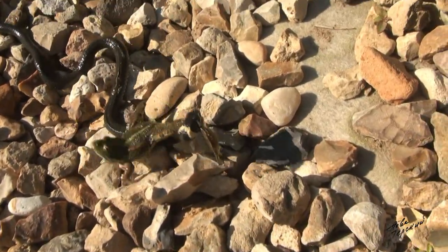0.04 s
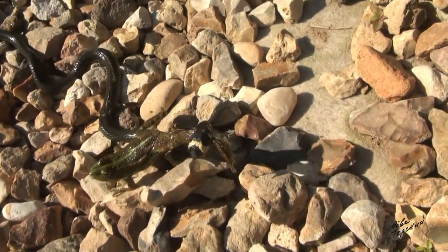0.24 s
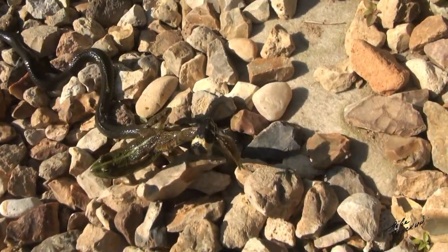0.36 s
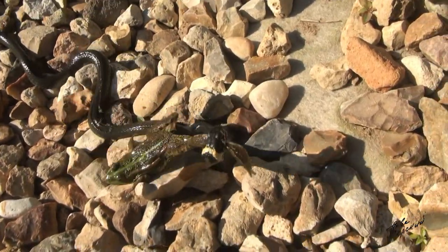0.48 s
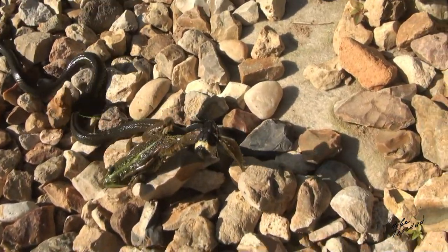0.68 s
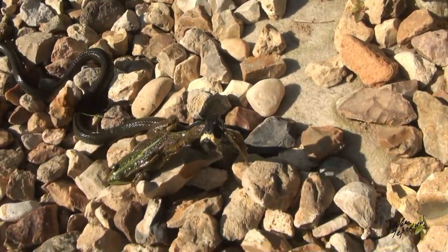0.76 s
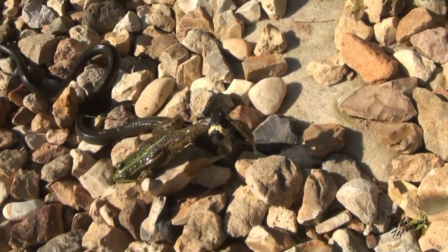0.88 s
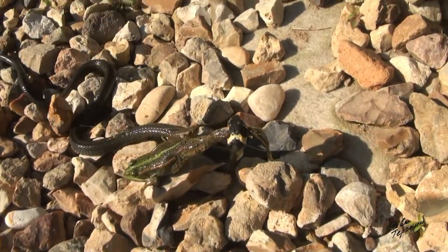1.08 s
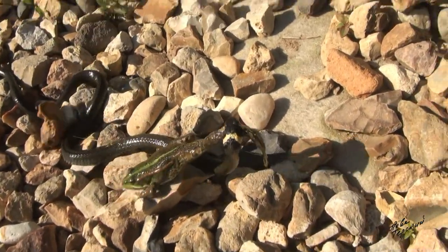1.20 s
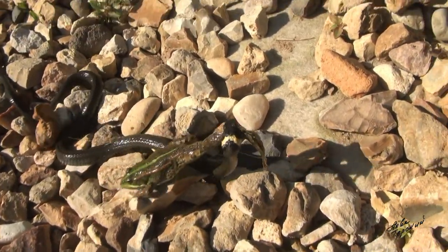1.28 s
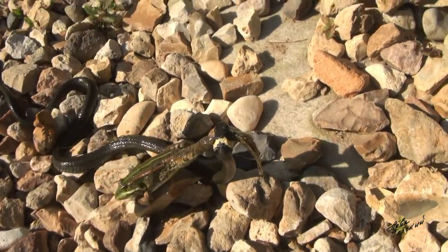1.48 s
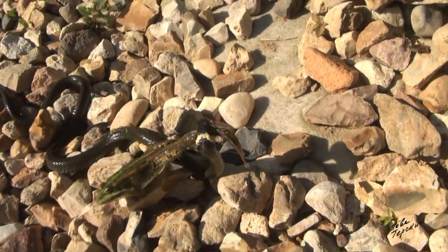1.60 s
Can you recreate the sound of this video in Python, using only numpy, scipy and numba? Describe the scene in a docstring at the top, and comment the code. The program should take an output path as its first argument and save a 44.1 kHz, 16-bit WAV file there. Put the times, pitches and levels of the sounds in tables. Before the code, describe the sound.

One loud, rasping frog scream comes near the start, close to the microphone. Scattered soft knocks and scrapes of pebbles follow, with faint distant birdsong and a steady outdoor hiss and low hum behind.

```python
"""Frog distress cry on pebbles

A frog seized by a snake gives one harsh cry: sharp larynx pulses ring in its open mouth,
speed up, catch, speed up again and slow to a creak. Pebbles knock and scrape under the
struggle. An insect buzzes briefly; small birds sing far off over hiss and a low hum."""
import sys
import numpy as np
from scipy import signal
from scipy.io import wavfile
from numba import njit

SR = 44100
rng = np.random.default_rng(int(sys.argv[2]) if len(sys.argv) > 2 else 0)


def digitize_waveform(pressure):
    """Quantize a signal to 16-bit integers and store it at the path in sys.argv[1].

    Rows of a 2-D input are taken as channels; values are limited to [-1, 1].
    """
    field = np.atleast_2d(pressure).T
    bounded = np.clip(field, -1, 1)
    quanta = np.round(bounded * 32767).astype(np.int16)
    wavfile.write(sys.argv[1], SR, quanta)


N = 72765
TIME = np.arange(N) / SR

# larynx pulses: (time [s], rate [Hz])
LARYNX_RATE = [(.2304, 194.1), (.2346, 79.5), (.2469, 335.1), (.2581, 411.1), (.2683, 555.1),
               (.2766, 477.3), (.2873, 194.9), (.3068, 441), (.3229, 393.8), (.3414, 401.6), (.3524, 329.4),
               (.3706, 315.5), (.3925, 205.6), (.4169, 166.2)]
# vocal strain, scales jitter and rasp: (time [s], factor [-])
VOICE_STRAIN = [(.295, 2.6), (.31, 0.4), (.4, 1.4)]
# resonance groups: (time [s], throat [dB], middle [dB], mouth [dB], top [dB])
CRY_GROUP_LEVELS = [(0.225, -56, -51.5, -36, -63), (.247, -24.5, -22, -28, -40.5),
                    (.272, -25, -21, -20.5, -43), (0.291, -30.5, -25, -22, -34.5),
                    (.313, -23.5, -21.5, -18, -34.5), (.35, -23.5, -31, -20, -31.5),
                    (0.412, -26, -42, -18.5, -40), (0.427, -27, -33, -33, -45), (0.446, -53, -62, -75, -97)]
# steady throat resonances: (centre [Hz], width [Hz], gain [dB])
THROAT_MODES = [(1200, 380, -1.5), (2680, 740, -9.5)]
# sinking middle resonance: (time [s], centre [Hz], width [Hz])
MIDDLE_GLIDE = [(.245, 2400, 1900), (.278, 2600, 1500), (.305, 2400, 1000), (.34, 2200, 900),
                (.365, 1550, 900)]
# mouth resonance, broad when agape, sinking as it shuts: (time [s], centre [Hz], width [Hz])
MOUTH_GLIDE = [(.236, 5500, 550), (.25, 5600, 2300), (.283, 6500, 2000), (.315, 6100, 1650),
               (.355, 5750, 1550), (.385, 5300, 950), (.415, 4850, 700), (.424, 4250, 900),
               (.435, 2300, 1500)]
# steady top resonances: (centre [Hz], width [Hz], gain [dB])
TOP_MODES = [(11500, 900, 4), (11650, 3500, 10)]
# pebble knocks: (time [s], impulse level [dB], contact low-pass [Hz], pitch factor [-])
PEBBLE_KNOCKS = [(0.5644, -27, 3270, 1.01), (0.651, -26.5, 1590, 1.002), (0.7426, -27, 5100, 1.064),
                 (.841, -37, 1800, 0.57), (0.994, -29, 1460, 0.56), (1.283, -30.5, 4560, 1.04),
                 (1.373, -31, 2500, 0.64), (1.4428, -31, 4970, 1.42), (1.4443, -28, 8950, 1.09)]
# pebble ring at pitch factor 1: (frequency [Hz], gain [dB], t60 [s])
PEBBLE_MODES = [(467, -3, 0.012), (883, -11.5, 0.047), (1370, -2.5, 0.018), (2150, -4, 0.006),
                (2940, 2, 0.0015)]
# stone over a hollow: (frequency [Hz], gain [dB], t60 [s])
HOLLOW_MODES = [(757, 5, 0.026), (1210, 3, 0.022), (1980, 0.5, 0.0056)]
# grit ticks: (time [s], level [dB], lower mode [Hz])
GRIT_TICKS = [(0.0492, -30, 2600), (.718, -37.5, 3220), (0.9102, -30, 2920), (.97, -41.5, 2860)]
# bodies dragging over stones: (centre time [s], half length [s], level [dB])
DRAGS = [(0.097, 0.0061, -44), (1.009, .012, -41), (1.277, 0.047, -48.5), (1.437, 0.023, -42),
         (1.649, 0.025, -45)]
# scrape spectrum: (frequency [Hz], relative density [dB])
SCRAPE_SPECTRUM = [(100, -6), (800, -0.5), (1200, 5), (2200, -11), (15000, -17.5)]
# insect resonances: (centre [Hz], width [Hz], gain [dB])
INSECT_MODES = [(11900, 700, -4.5), (14200, 1100, -6.5)]
# faint bird calls: (centre time [s], half length [s], centre [Hz], width [Hz], level [dB])
BIRD_CALLS = [(1.144, 0.04, 5460, 830, -54), (1.373, 0.088, 3900, 1130, -51.5)]
# outdoor noise: (frequency [Hz], relative density [dB])
AIR_SPECTRUM = [(25, -2), (107, -6.5), (871, -9), (2230, -13.5), (3170, -10.5), (3530, -19.5),
                (5580, -16.5), (15500, -25.5)]
# left-right likeness of air and scrapes: (frequency [Hz], correlation [0-1])
STEREO_LIKENESS = [(70, 1), (300, 0.76), (12000, 0.13)]
# distant hum: (time [s], level [dB])
HUM_LEVEL = [(.15, -54.5), (1.65, -64)]


def larynx(rate_hz, cycles, jitter_s=1e-5, shimmer_db=.44, rebound_s=.0012, puff_s=.00052, rasp=.038):
    """Uneven pulses, each with a weak inverted rebound and a noise puff. Returns voice and sizzle."""
    strain, = in_time(VOICE_STRAIN)
    pulse_s = np.interp(np.arange(1, int(cycles[SR // 2])), cycles, TIME)
    jitter, shimmer, rebound_jitter, rebound_shimmer = rng.standard_normal((len(pulse_s), 4)).T
    pulse_s += jitter_s * np.interp(pulse_s, TIME, strain) * jitter
    pulses = clicks(pulse_s, -from_db(shimmer_db * shimmer))
    pulses += clicks(pulse_s + rebound_s + 5e-5 * rebound_jitter, from_db(-12 + 2 * rebound_shimmer))
    from_pulse_s = np.abs(cycles - np.round(cycles)) / rate_hz
    puffs = rng.standard_normal(N) * np.exp(-from_pulse_s / puff_s)
    return pulses + rasp * strain * puffs, pulses + puffs


def frog(start_s=.22):
    """The larynx rings four resonance groups; the top one is mostly wet sizzle."""
    rate_hz, = in_time(LARYNX_RATE)
    cycles = np.cumsum(rate_hz * (TIME > start_s)) / SR
    voice, sizzle = larynx(rate_hz, cycles)
    groups = [cut(cut(resonances(voice, THROAT_MODES), 800, "high", order=4), 2740, "low", order=4),
              cut(formant(voice, MIDDLE_GLIDE), 1430, "high", order=3),
              cut(cut(formant(voice, MOUTH_GLIDE), 1580, "high"), 9340, "low", order=5),
              cut(resonances(sizzle, TOP_MODES), [9500, 14200], "band", order=3)]
    groups = np.array(groups) / np.sqrt(rate_hz)  # even power at any pulse rate
    sounding = (TIME > CRY_GROUP_LEVELS[0][0]) & (TIME < CRY_GROUP_LEVELS[-1][0])
    groups /= np.std(groups[:, sounding], axis=1, keepdims=True)
    throat, middle, mouth, top = groups * from_db(in_time(CRY_GROUP_LEVELS)) * sounding
    bright = panned(middle + mouth + top, db=1.3)
    fundamental = from_db(-42) * swell(.274, .005) * np.sin(2 * np.pi * cycles)  # near peak pitch
    cry = throat + bright + fundamental
    echo = scatter(bright, db=-7.5, t60_s=.015, delay_s=.00044, alike=0)
    return cry + echo + scatter(cry, db=-10, t60_s=.044, delay_s=.0032, alike=.29)


def stones(clunk_s=.9243, tick_t60_s=.006):
    """Pebbles knock and crunch, a stone rocks over a hollow, grit ticks; the bed scatters it all."""
    knocks = ticks = 0
    for s, db, contact_hz, pitch in PEBBLE_KNOCKS:
        contact = cut(clicks(s, from_db(db)), contact_hz, "low", order=1)
        crunch = from_db(db - 4) * swell(s, half_s=.0014) * rng.standard_normal((2, N))
        knocks += ring(contact, PEBBLE_MODES, pitch) + cut(crunch, contact_hz, "low", order=1)
    clunk = ring(cut(clicks(clunk_s, from_db(-30.5)), 2520, "low"), HOLLOW_MODES)
    for s, db, hz in GRIT_TICKS:
        ticks += ring(clicks(s, from_db(db)), [(hz, 0, tick_t60_s), (hz * 1.57, -3, tick_t60_s)])
    direct = panned(cut(knocks, 254, "high"), db=-2.5) + panned(clunk, db=-6) + ticks
    echo = scatter(direct, db=-8, t60_s=.055, delay_s=.00068, alike=.95)
    return direct + echo + scatter(direct, db=-14, t60_s=.19, delay_s=.0043, alike=.28)


def scrapes(grains_per_s=3400, spread_db=4.5):
    """Dense gritty grains under each drag."""
    shape = (2, 2, N)
    grains = (rng.random(shape) < grains_per_s / SR) * rng.choice([-1, 1], shape)
    sizes = from_db(spread_db * np.minimum(rng.exponential(1, shape), 4))
    envelope = sum(from_db(db) * swell(s, half_s) for s, half_s, db in DRAGS)
    return coloured(grains * sizes, SCRAPE_SPECTRUM) * envelope


def bird_song(count=11, start_s=.51, gap_s=.0538, slowing_s=.00042, note_hz=3166, fall_hz_per_s=13000):
    """A slowing run of falling whistles that swells and fades, blurred by distance."""
    notes = 0
    for k in range(count):
        s = start_s + gap_s * k + slowing_s * k * k
        t = TIME - s
        whistle = np.sin(2 * np.pi * (note_hz * t - fall_hz_per_s * t * t / 2))
        arch_db = -2 * (2 * k / count - 1) ** 2
        notes += from_db(arch_db) * swell(s, half_s=.005) * whistle
    song = from_db(-48.5) * np.array([notes, notes])
    return song + scatter(song, db=-11, t60_s=.3, delay_s=.01, alike=.3)


def far_birds():
    """Thin, distant calls smeared into bands of noise."""
    calls = 0
    for s, half_s, hz, width_hz, db in BIRD_CALLS:
        band = cut(rng.standard_normal((2, N)), [hz - width_hz / 2, hz + width_hz / 2], "band")
        calls += from_db(db) * swell(s, half_s) * rms_one(band)
    return calls


def insect(stroke_hz=85.7, throb_db=9, end_s=.254, fade_s=.018):
    """Rapid wing strokes rub two very high resonances."""
    strokes = from_db(throb_db * np.cos(2 * np.pi * stroke_hz * (TIME - .004)))
    buzz = np.array([resonances(noise * strokes, INSECT_MODES) for noise in rng.standard_normal((2, N))])
    fade = np.clip((end_s - TIME) / fade_s, 0, 1)
    return from_db(-47.5) * rms_one(cut(buzz, 6900, "high", order=6)) * fade


def background(hum_hz=98, width_hz=36.5):
    """Outdoor hiss and rumble with a wavering distant hum."""
    air = from_db(-50) * coloured(rng.standard_normal((2, 2, N)), AIR_SPECTRUM)
    hum = cut(rng.standard_normal(N + SR), [hum_hz - width_hz / 2, hum_hz + width_hz / 2], "band")[SR:]
    hum_db, = in_time(HUM_LEVEL)
    return air + from_db(hum_db) * rms_one(hum)


def from_db(db):
    """Decibels to gain."""
    return 10 ** (np.asarray(db) / 20)


def rms_one(x):
    """Scale to rms 1."""
    return x / np.sqrt(np.mean(x ** 2) + 1e-20)


def in_time(rows):
    """Each column of a curve, at every sample."""
    s, *columns = np.transpose(rows)
    return [np.interp(TIME, s, column) for column in columns]


def at_hz(points, hz):
    """Read a spectrum on a log axis."""
    points_hz, values = np.transpose(points)
    return np.interp(np.log(hz), np.log(points_hz), values)


def cut(x, hz, kind, order=2):
    """Butterworth filter."""
    sos = signal.butter(order, np.clip(hz, 10, .45 * SR), kind, fs=SR, output="sos")
    return signal.sosfilt(sos, x + 1e-18)


def swell(s, half_s):
    """Gaussian envelope around s."""
    return np.exp(-.5 * np.minimum(((TIME - s) / half_s) ** 2, 100))


def clicks(s, size):
    """Impulses at exact times, each split between two samples."""
    out, at = np.zeros(N), np.clip(np.atleast_1d(s) * SR, 0, N - 2)
    np.add.at(out, at.astype(int), size * (1 - at % 1))
    np.add.at(out, at.astype(int) + 1, size * (at % 1))
    return out


@njit
def resonate(x, turn_rad, radius):
    """One complex pole; centre and damping set per sample."""
    out, z = np.zeros(len(x)), 0j
    for i in range(len(x)):
        z = z * radius[i] * np.exp(1j * turn_rad[i]) + x[i] + 1e-18
        out[i] = z.real * (1 - radius[i])
    return out


def resonances(x, modes):
    """Parallel resonances, steady or moving."""
    step_s = np.ones(N) / SR
    return sum(from_db(db) * resonate(x, 2 * np.pi * hz * step_s, np.exp(-np.pi * width_hz * step_s))
               for hz, width_hz, db in modes)


def formant(x, curve):
    """A steep-sided resonance that glides and narrows at even loudness."""
    hz, width_hz = in_time(curve)
    mode = [(hz, width_hz, 0)]
    return resonances(resonances(x, mode), mode) / np.sqrt(width_hz)


def ring(x, modes, pitch=1):
    """Struck modes of alternating sign."""
    out = 0
    for k, (hz, db, t60_s) in enumerate(modes):
        radius, turn_rad = from_db(-60 / (t60_s * SR)), 2 * np.pi * hz * pitch / SR
        feedback = [1, -2 * radius * np.cos(turn_rad), radius ** 2]
        out += (-1) ** k * from_db(db) * signal.lfilter([0, np.sin(turn_rad)], feedback, x + 1e-18)
    return out


def coloured(sources, spectrum):
    """Stereo half-octave bands from two mid-side pairs in turn; rms 1."""
    out, edges_hz = 0, 22 * 2 ** np.arange(0, 9.6, .5)
    for k, (low, high) in enumerate(zip(edges_hz, edges_hz[1:])):
        mid, side = cut(sources[k % 2], [low, high], "band")
        hz = np.sqrt(low * high)
        alike = at_hz(STEREO_LIKENESS, hz)
        band = np.sqrt(1 + alike) * mid + np.sqrt(1 - alike) * side * [[1], [-1]]
        out += from_db(at_hz(spectrum, hz)) * band
    return rms_one(out)


def panned(x, db):
    """Pan by left-minus-right level."""
    return x * from_db(np.array([[db], [-db]]) / 2)


def scatter(x, db, t60_s, delay_s, alike):
    """Dense decaying reflections; alike is their left-right correlation."""
    t = TIME[:SR // 4]
    noise = rng.standard_normal((3, len(t)))
    echoes = np.sqrt(alike) * noise[2] + np.sqrt(1 - alike) * noise[:2]
    echoes *= from_db(-60 * t / t60_s) * (t > delay_s)
    echoes /= np.sqrt(np.sum(echoes ** 2, axis=1, keepdims=True))
    return from_db(db) * signal.fftconvolve(x, echoes, axes=1)[:, :N]


def scene():
    """The cry, the struggle on the stones and the garden around."""
    return frog() + stones() + scrapes() + bird_song() + far_birds() + insect() + background()


def record(dry):
    """Steep low-pass at 15.8 kHz."""
    return signal.sosfilt(signal.ellip(10, .1, 80, 15800, fs=SR, output="sos"), dry)


dry = scene()
out = record(dry)
digitize_waveform(out)
```